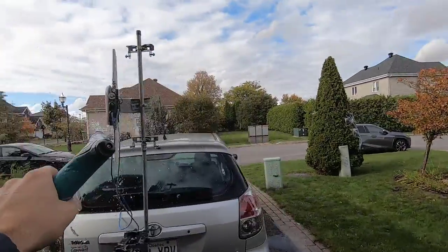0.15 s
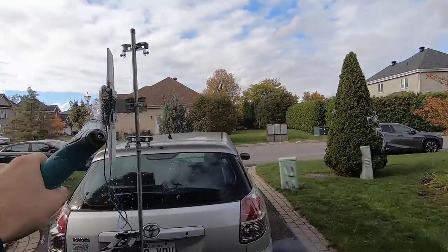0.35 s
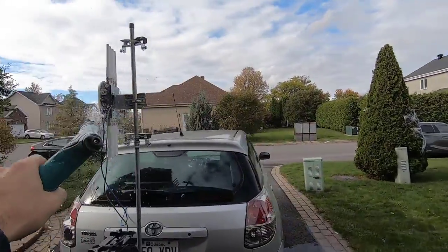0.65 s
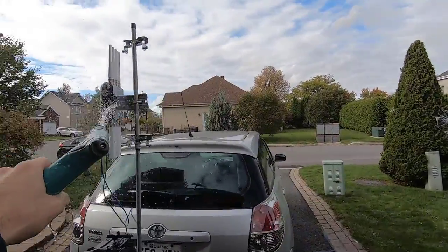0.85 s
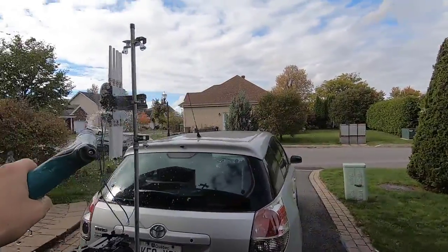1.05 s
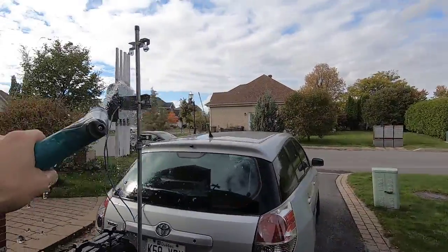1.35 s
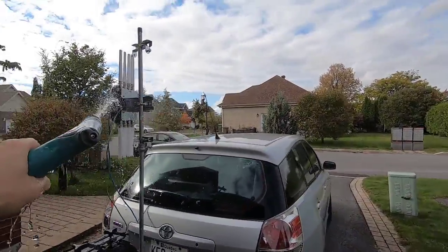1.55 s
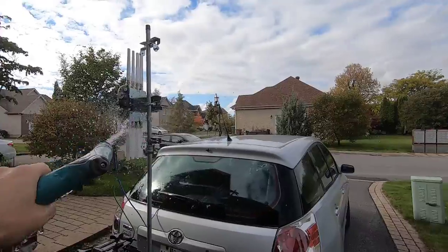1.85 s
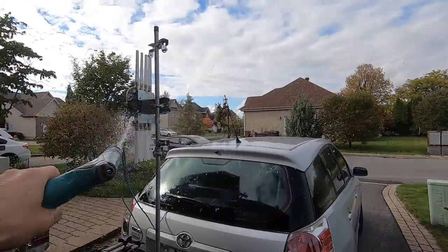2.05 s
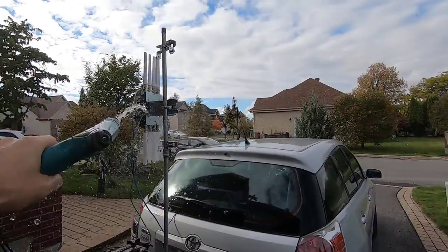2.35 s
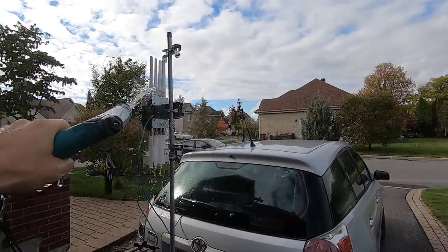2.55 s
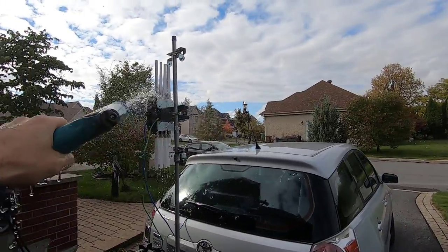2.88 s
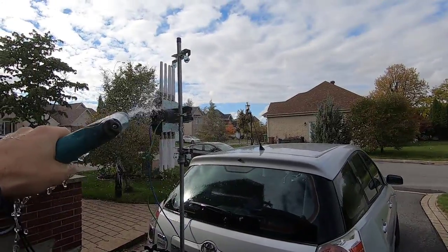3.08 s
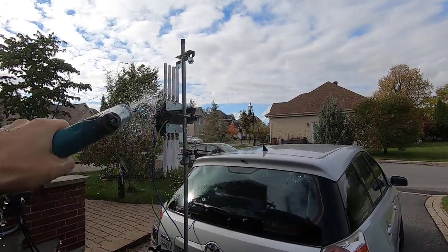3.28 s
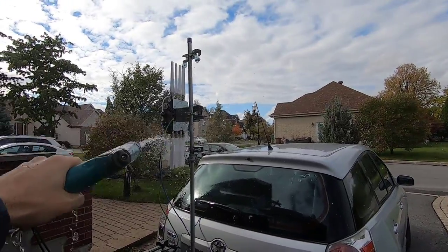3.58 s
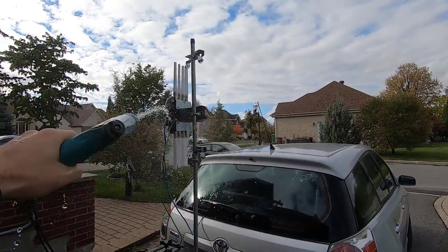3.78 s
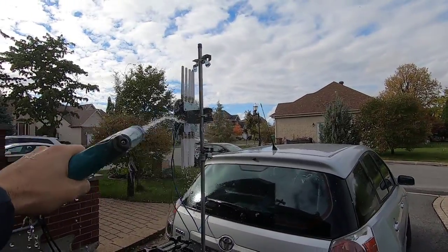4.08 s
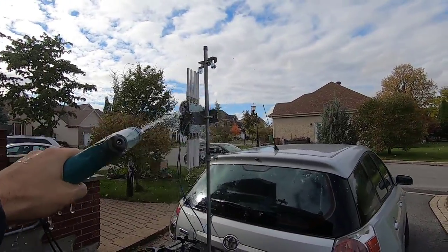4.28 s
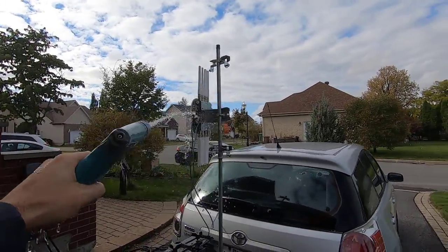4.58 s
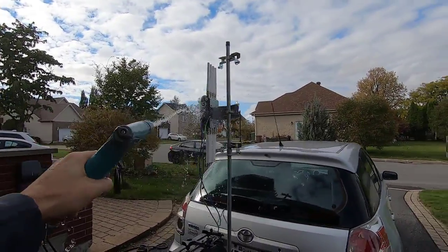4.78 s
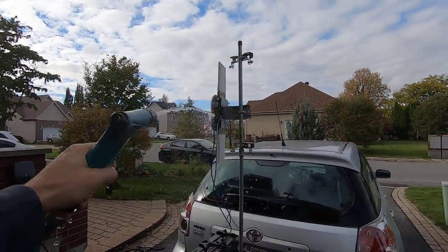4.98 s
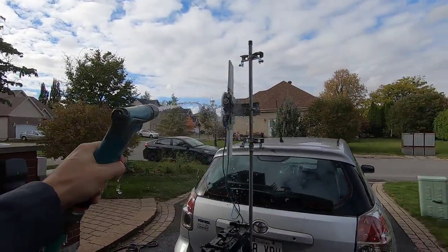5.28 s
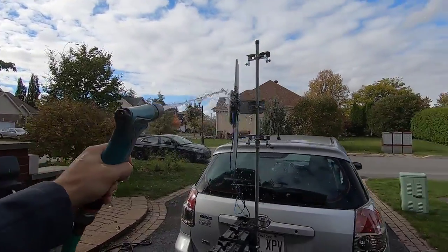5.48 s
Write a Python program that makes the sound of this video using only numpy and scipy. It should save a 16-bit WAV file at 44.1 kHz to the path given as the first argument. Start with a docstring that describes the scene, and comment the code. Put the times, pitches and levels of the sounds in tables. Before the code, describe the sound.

A garden hose jet spatters brightly on a thin antenna, cracking and rattling, while run-off thuds on a car roof outdoors.

```python
"""On a quiet street, a garden hose plays over an antenna on a mast behind a parked car.
The jet breaks into drops: random impacts that spatter on the antenna and rattle its hollow panel.
Run-off excites the damped modes of the car roof; fat drops ping, slugs slap and air pockets ring.
The nozzle hisses and the street murmurs as steady coloured noise.
A light breeze adds a low, uneven rumble at the two ports of a small camera, with a few soft bumps."""
import sys
import numpy as np
from scipy import signal
from scipy.fft import rfft, irfft, next_fast_len
from scipy.io import wavfile
from scipy.ndimage import uniform_filter1d

SR = 44100
rng = np.random.default_rng(int(sys.argv[2]) if len(sys.argv) > 2 else 0)


def waveform_to_disk(signal):
    """Save audio, clipped to [-1, 1], as 16-bit WAV at the path in sys.argv[1]."""
    frames = np.transpose(np.atleast_2d(signal))
    scaled = np.clip(frames, -1, 1) * 32767
    samples = np.round(scaled).astype(np.int16)
    wavfile.write(sys.argv[1], SR, samples)


N = 248283  # samples


def from_db(db):
    """Level to amplitude: every 20 dB is a factor of ten."""
    return 10 ** (np.asarray(db) / 20)


def rms_one(x):
    """Normalization: scale a signal to unit root-mean-square."""
    return x / np.sqrt(np.mean(x ** 2) + 1e-20)


def level(rows):
    """Level contour: (s, dB) points joined by straight lines in dB, as a gain per sample."""
    times, levels_db = np.transpose(rows)
    return from_db(np.interp(np.arange(N) / SR, times, levels_db))


def envelope(s, length_s, attack_s, decay_s):
    """Amplitude envelope: linear rise, hold until the length is over, exponential decay."""
    age = np.arange(N) / SR - s
    rise = np.clip(age / attack_s, 0, 1)
    return rise * np.exp(-np.clip((age - length_s) / decay_s, 0, 20))


def over_bins(points, size):
    """Spectral interpolation: a (Hz, value) table read at every bin on a log-frequency axis."""
    hz, value = np.transpose(points)
    bins_hz = np.arange(size // 2 + 1) * SR / size
    return np.interp(np.log(bins_hz + 1), np.log(hz), value)


def colour(x, spectrum):
    """Minimum-phase filtering: folding the cepstrum makes the given (Hz, dB) response causal."""
    size = 8192
    cepstrum = irfft(np.log(from_db(over_bins(spectrum, size))))
    cepstrum[1:size // 2] *= 2
    cepstrum[size // 2 + 1:] = 0
    impulse_response = irfft(np.exp(rfft(cepstrum)))
    return signal.oaconvolve(x, impulse_response[None], axes=1)[:, :N]


def shaped(x, spectrum):
    """Spectral shaping: colour with the spectrum, falling away beyond both its ends; rms 1."""
    (low, low_db), (high, high_db) = spectrum[0], spectrum[-1]
    return rms_one(colour(x, [(low / 2, low_db - 20), *spectrum, (high * 2, high_db - 40)]))


def band(x, low_hz, high_hz):
    """Band-pass filtering: a first-order design with gentle skirts."""
    edges = [max(low_hz, 10), min(high_hz, SR * .45)]
    return signal.sosfilt(signal.butter(1, edges, "band", fs=SR, output="sos"), x)


def drift(rate):
    """Slow random modulation: noise through a double pole near `rate` Hz, with unit rms."""
    step = 20  # samples between computed points
    settle = 2000  # points dropped while the filter settles
    r = np.exp(-2 * np.pi * step * rate / SR)
    noise = rng.standard_normal(N // step + settle + 2)
    slow = signal.lfilter([1], [1, -2 * r, r * r], noise)[settle:]
    return np.interp(np.arange(N) / step, np.arange(len(slow)), rms_one(slow))


def stereo_noise(alike, size):
    """Partial coherence: white noise at two ports that share the part `alike` of its power."""
    both, *own = rng.standard_normal((3, size))
    alike = np.clip(alike, 0, 1)
    return np.sqrt(alike) * both + np.sqrt(1 - alike) * np.array(own)


def steady(x, span_s):
    """Constant flow: even out the mean power over spans longer than span_s."""
    power = uniform_filter1d(np.mean(x ** 2, axis=0), int(span_s * SR) + 1)
    return x / np.sqrt(power + 1e-9)


def drops(per_s, spread_db, clump_db, clump_rate):
    """Random impacts: drops of uneven size and sign, stronger and weaker in clumps."""
    size_db = spread_db * np.minimum(rng.exponential(1, N), 3.8)
    sizes = from_db(size_db + clump_db * drift(clump_rate))
    return sizes * rng.choice([-1, 1], N) * (rng.random(N) < per_s / SR)


def splashes(impacts, pitches, width_hz, crack_s, tail_s, tail_db, alike, wander_db):
    """Impact response: each landing spot has its own band, short crack and diffuse droplet tail."""
    t = np.arange(2048) / SR
    spot, out = rng.integers(0, len(pitches), N), 0
    for k, hz in enumerate(pitches):
        crack = rms_one(stereo_noise(alike, len(t)) * np.exp(-t / crack_s))
        tail = rms_one(stereo_noise(0, len(t)) * np.exp(-t / tail_s))
        # the geometric mean of the band edges is the spot's pitch
        low = np.hypot(hz, width_hz / 2) - width_hz / 2
        splash = rms_one(band(crack + from_db(tail_db) * tail, low, low + width_hz))
        aim = from_db(wander_db * drift(27.4))  # the jet wanders from spot to spot
        landed = impacts * aim * (spot == k)
        out = out + signal.oaconvolve(landed[None], splash, axes=1)
    return out


def ring(clicks, hz, t60):
    """Damped resonance: a two-pole mode of about unit energy, falling 60 dB in t60 seconds."""
    r, w = from_db(-60 / (t60 * SR)), 2 * np.pi * hz / SR
    mode = signal.lfilter([0, np.sin(w)], [1, -2 * r * np.cos(w), r * r], clicks + 1e-18)
    return 2 * np.sqrt(1 - r) * mode


# Rumble of the breeze before its gusts. Each row: time in seconds, relative level in dB.
BREEZE_LEVEL = [(0, -44.5), (.2, -55), (.6, -51), (2.2, -55.5), (4.3, -56), (5.63, -51)]
# Spectrum of the breeze. Each row: frequency in Hz, relative level in dB per Hz.
BREEZE_COLOUR = [(12, 0.5), (28, 2.5), (45, -1), (75, -21), (130, -19), (400, -32)]
# Soft bumps on the camera. Each row: peak time in seconds, relative level in dB, decay in seconds.
CAMERA_BUMPS = [(0.017, -42.5, 0.048), (0.121, -38, 0.015), (1.239, -41, 0.047), (5.415, -34.5, 0.03)]


def breeze():
    """Flow noise: nearly incoherent, gust-modulated rumble at the ports, with decaying soft bumps."""
    t = np.arange(N) / SR
    force = sum(from_db(db) * (t > s) * np.exp(-np.abs(t - s) / decay_s)
                for s, db, decay_s in CAMERA_BUMPS)
    bump_colour = [(25, 16.0), (55, 14.5), (100, 2.5), (190, -2), (300, -13)]  # (Hz, dB per Hz)
    bumps = force * steady(shaped(stereo_noise(0.063, N), bump_colour), span_s=0.0069)
    gusts = from_db(3.5 * drift(8) - 1.5)
    rumble = shaped(stereo_noise(0.11, N), BREEZE_COLOUR)
    return bumps + from_db(-0.5) * level(BREEZE_LEVEL) * gusts * rumble


# Spectrum of the hiss. Each row: frequency in Hz, relative level in dB per Hz.
HISS_COLOUR = [(2000, 7.5), (4300, 8.5), (5200, 19), (5900, 14), (7000, 6.5), (8700, 1), (10000, 14),
               (11500, 4), (14500, -4)]


def nozzle():
    """Jet noise: a steady, weakly coherent hiss with a coloured spectrum."""
    return from_db(-47.5) * shaped(stereo_noise(0.13, N), HISS_COLOUR)


# Spectrum of the street. Each row: frequency in Hz, relative level in dB per Hz.
MURMUR_COLOUR = [(30, -20), (100, -14.5), (190, -2), (500, -7), (1000, -3.5), (1700, -2.5), (2600, -15)]


def street():
    """Ambient noise: a steady, partly coherent murmur, mostly at low and middle frequencies."""
    return from_db(-56.0) * shaped(stereo_noise(0.58, N), MURMUR_COLOUR)


# Strength of the spatter while the jet is on. Each row: time in seconds, relative level in dB.
JET_LEVEL = [(0, -39.5), (0.55, -33), (0.75, -34.5), (1.0, -33), (1.55, -34.5), (1.82, -31), (2.03, -34.5),
             (2.18, -33), (2.35, -35), (2.9, -37.5), (3.22, -33), (3.9, -30.5), (4.3, -35), (4.8, -32),
             (5.63, -35.5)]
# The jet is on the antenna. Each row: start in seconds, length in seconds, relative level in dB.
JET_SWEEPS = [(0.076, 0.12, 1.5), (0.23, 0.2, -16.5), (0.453, 2.66, -0.5), (3.124, 0.46, -1.5),
              (3.61, 0.12, -2), (3.803, 0.26, -4), (4.096, 0.1, 1), (4.205, 0.13, 1.5),
              (4.324, 0.075, -8.5), (4.623, 0.26, -1), (4.961, 0.07, -6), (5.054, 0.44, -1),
              (5.558, 0.11, 1)]
SWEEP_ATTACK_S, SWEEP_DECAY_S = 0.021, 0.0095
STRAY_DB = -12  # drops that still land when the jet slips past


def jet():
    """Driving force: water on the antenna comes and goes as the hand sweeps the jet on and off."""
    on = [from_db(db) * envelope(s, length_s, SWEEP_ATTACK_S, SWEEP_DECAY_S)
          for s, length_s, db in JET_SWEEPS]
    return level(JET_LEVEL) * np.hypot(np.max(on, axis=0), from_db(STRAY_DB))


# Colouring of the fine spatter. Each row: frequency in Hz, filter gain in dB.
FINE_COLOUR = [(400, -7), (1000, -11), (2100, -3), (2650, -10), (3200, 0), (3700, 0.5), (4300, -2.5),
               (5600, 4.5), (6900, -2), (8000, 4), (9000, -0.5), (10000, 5), (12800, -9.5), (14500, -14.5)]


def spatter(force):
    """Random impact noise: drops crack on antenna and mast, thinning out as the jet slips past."""
    rate = 3000 * (force / force.max()) ** 1.1  # drops per second
    impacts = drops(per_s=rate, spread_db=4.2, clump_db=1.5, clump_rate=180)
    wet = splashes(impacts, np.linspace(2800, 13500, num=22), width_hz=1900, crack_s=0.00045,
                   tail_s=0.01, tail_db=-5.5, alike=0.88, wander_db=3.2)
    sway = from_db(0.98 + 1.22 * drift(9.2))
    return sway * force * steady(shaped(wet, FINE_COLOUR), span_s=0.04)


# The jet meets the panel squarely. Each row: start in seconds, length in seconds (also the rise
# time), relative level in dB.
SQUARE_HITS = [(0.142, 0.016, -41.5), (0.946, 0.041, -42.5), (1.094, 0.032, -40), (1.594, 0.043, -37.5),
               (1.787, 0.13, -47), (2.405, 0.095, -37), (2.968, 0.017, -45), (3.148, 0.054, -41.5),
               (3.48, 0.071, -41.5), (3.939, 0.064, -47), (4.088, 0.069, -40.5)]
# Colouring of the panel. Each row: frequency in Hz, filter gain in dB.
HOLLOW_COLOUR = [(300, -29.5), (650, 2), (920, -3.5), (1150, 1), (1550, 5), (2200, 1.5), (3400, 4),
                 (4500, 0), (7000, -26)]
RATTLE_DECAY_S = 0.033
GLANCING_DB = -19  # the panel's share of any spatter
PLOP_CYCLES, PLOP_DB = 64, -12  # trapped air: cycles to fall 60 dB, level against the cracks


def panel(force):
    """Cavity resonance: drops rattle the hollow plastic panel and ring pockets of air against it."""
    square = sum(from_db(db) * envelope(s, length_s, length_s, RATTLE_DECAY_S)
                 for s, length_s, db in SQUARE_HITS)
    impacts = drops(per_s=600, spread_db=3.0, clump_db=1.5, clump_rate=50)
    hollow = splashes(impacts, np.linspace(700, 4000, num=10), width_hz=1500, crack_s=0.0008,
                      tail_s=0.014, tail_db=-3, alike=0.74, wander_db=3.5)
    pitches = np.geomspace(780, 2400, num=24)
    pocket = rng.integers(0, 2 * len(pitches), N)  # about half of the drops trap air
    plops = sum(ring(impacts * (pocket == k), hz, PLOP_CYCLES / hz) for k, hz in enumerate(pitches))
    rattle = shaped(rms_one(hollow[:, :N]) + from_db(PLOP_DB) * rms_one(plops), HOLLOW_COLOUR)
    force_on_panel = np.hypot(square, from_db(GLANCING_DB) * force)
    return from_db(6.0) * force_on_panel * steady(rattle, span_s=0.064)


# Steady dripping between gushes. Each row: time in seconds, relative level in dB.
DRIPPING_LEVEL = [(0, -64), (0.55, -55), (0.92, -58.5), (1.6, -51), (2.2, -54.5), (2.8, -52.5), (3.3, -59),
                  (3.8, -50.5), (4.5, -56.5), (4.8, -52), (5.05, -58.5), (5.63, -64)]
# Gushes of run-off. Each row: start in seconds, length in seconds, relative level in dB.
ROOF_GUSHES = [(0.096, 0.038, -45), (0.36, 0.11, -50.5), (1.084, 0.08, -47.5), (1.209, 0.028, -45),
               (1.409, 0.023, -45.5), (1.704, 0.13, -46.5), (1.874, 0.018, -43.5), (2.398, 0.031, -43.5),
               (2.958, 0.079, -48), (4.065, 0.048, -42.5), (5.46, 0.043, -50.5)]
# Modes of the roof panel. Each row: frequency in Hz, relative level in dB, 60 dB decay in seconds.
SHEET_MODES = [(156, -4, 0.73), (185, 1, 0.26), (213, -0.5, 0.13), (254.6, -2, 0.34), (288, -5, 0.09),
               (341.4, -0.5, 0.91), (420, -1, 0.23), (470, -5.5, 0.1), (545, -6, 0.19), (761, -3, 0.096)]
# Colouring of the thuds. Each row: frequency in Hz, filter gain in dB.
ROOF_COLOUR = [(90, -18.5), (135, -29), (170, 3.5), (400, -2), (600, -13), (900, -3.5), (2000, -17.5)]
GUSH_ATTACK_S, GUSH_DECAY_S = 0.012, 0.029
RUN_OFF_EVEN_S = 0.055  # power is evened out over longer spans


def roof():
    """Modal excitation: run-off thuds on the sheet metal and sets its low modes humming."""
    gushes = sum(from_db(db) * envelope(s, length_s, GUSH_ATTACK_S, GUSH_DECAY_S)
                 for s, length_s, db in ROOF_GUSHES)
    impacts = drops(per_s=190, spread_db=3.0, clump_db=2.5, clump_rate=12)
    thuds = splashes(impacts, np.linspace(200, 800, num=6), width_hz=370, crack_s=0.0058,
                     tail_s=0.0028, tail_db=-3.5, alike=1.0, wander_db=-1.0)
    hum = sum(from_db(db) * ring(impacts * rng.standard_normal(N), hz, t60)
              for hz, db, t60 in SHEET_MODES)
    drumming = shaped(thuds, ROOF_COLOUR) + from_db(-1.0) * rms_one(hum)
    flow = np.hypot(gushes, level(DRIPPING_LEVEL))
    return from_db(0.47) * flow * steady(drumming, span_s=RUN_OFF_EVEN_S)


# Single fat drops. Each row: start in seconds, relative peak level in dB, pitch in Hz.
SINGLE_DROPS = [(0.0987, -23, 5400), (0.1205, -20.5, 5630), (0.162, -20.5, 5370), (0.184, -19, 7300),
                (0.2454, -28, 5200), (0.332, -26.5, 5730), (0.378, -21.5, 5340), (0.4594, -25.5, 3450),
                (0.4835, -21, 3260), (0.4874, -20, 5310), (0.549, -27.5, 3720), (0.5828, -26, 3260),
                (0.8136, -22, 5300), (0.905, -19.5, 5500), (0.9748, -19.5, 3680), (1.0186, -16, 8050),
                (1.048, -13, 10100), (1.1055, -18.5, 4500), (1.1107, -22, 3220), (1.1297, -21, 3470),
                (1.26, -17.5, 4900), (1.3088, -17, 5640), (1.3606, -21, 7600), (1.3886, -18, 4800),
                (1.591, -22, 5450), (1.6065, -25, 3110), (1.6144, -25, 2930), (1.6172, -27, 3620),
                (1.6831, -19, 9800), (1.8114, -17, 7700), (1.8505, -20.5, 3140), (1.9335, -22.5, 2990),
                (2.1162, -13, 10500), (2.138, -23.5, 3320), (2.1667, -15, 5160), (2.1932, -16.5, 5600),
                (2.4077, -16.5, 9800), (2.4533, -24.5, 3260), (2.5424, -18, 4900), (2.668, -17.5, 7800),
                (2.76, -13.5, 5950), (2.824, -16, 9760), (2.8883, -30, 3440), (3.04, -21.5, 5830),
                (3.2735, -13.5, 6200), (3.3774, -18.5, 8100), (3.5632, -20.5, 3800), (3.6882, -17.5, 5900),
                (3.705, -14, 5800), (3.718, -15.5, 6230), (3.9056, -25.5, 3700), (3.9838, -28, 5500),
                (4.0078, -17, 10600), (4.0892, -22, 9870), (4.116, -28, 5830), (4.156, -19.5, 6000),
                (4.2558, -20.5, 3730), (4.2654, -20, 10400), (4.296, -23, 3470), (4.3094, -26, 8100),
                (4.4214, -34.5, 5200), (4.4866, -21, 6200), (4.6309, -20.5, 5800), (4.8045, -19, 5500),
                (4.8413, -21, 4300), (4.9745, -17.5, 5940), (5.018, -28.5, 3600), (5.077, -26, 10700),
                (5.0987, -22, 4170), (5.122, -20.5, 3750), (5.2175, -13.5, 9700), (5.3033, -14.5, 7800),
                (5.3622, -14, 10300), (5.4017, -21, 5600), (5.5544, -22.5, 5440)]
DROP_DB, DROP_SPRAY_DB = 3.5, -8  # level of all drops; spray within a drop
DROP_BURST_S, DROP_CYCLES, DROP_CRACK_S = .0006, 2.2, .0005  # delay, cycles to ping's peak, crack decay
STRAY_PAN_DB = -7.5  # left-right: drops that miss the antenna land further right


def fat_drops(force):
    """Transient radiation: a sharp crack, a ping of a few cycles and a faint spray in its range."""
    out, t = np.zeros((2, N)), np.arange(2048) / SR
    for s, db, hz in SINGLE_DROPS:
        age = t * hz / DROP_CYCLES
        ping = age * np.exp(1 - age) * np.sin(2 * np.pi * hz * t)
        crack = band(stereo_noise(0.9, len(t)) * np.exp(-t / DROP_CRACK_S), hz * 0.8, hz * 1.7)
        crack = from_db(7) * band(crack, 2000, 9000)
        spray = band(stereo_noise(0.6, len(t)) * np.exp(-t / 0.005), hz * 0.8, hz * 1.15)
        drop = ping + crack + from_db(DROP_SPRAY_DB) * spray / spray.max()
        drop = from_db(db + DROP_DB) * drop / np.abs(drop).max()
        at = round((s + DROP_BURST_S) * SR)
        # a weak jet at this moment counts as a miss
        pan_db = STRAY_PAN_DB * np.clip(1 - force[at] / np.median(force), 0, 1)
        panned = drop * from_db([[pan_db / 2], [-pan_db / 2]])
        out[:, at:at + len(t)] += panned[:, :N - at]
    return out


# Slugs landing all at once. Each row: start in seconds, relative level in dB, reference pitch in Hz.
SLUGS = [(0.405, -37, 900), (1.428, -40.5, 850), (2.960, -37, 470), (3.502, -27.5, 442),
         (3.6606, -27.5, 419)]
SLAP_CRACK_DB, SLAP_SMACK_DB, SLAP_SLOSH_DB = 14, 8, 7.5
SLAP_SAG, SLAP_SAG_S = 0.25, 0.0216  # the ring falls in pitch as the slug spreads: share, time
# hollow ring: level, share of the reference pitch, decay in seconds, depth of waver
SLAP_RING_DB, SLAP_RING_SHARE, SLAP_RING_S, SLAP_RING_WAVER = -5.5, .9, .036, .15
SLAP_BOOM_DB, SLAP_BOOM_SHARE = -4, .56  # lower mode: level and pitch against the ring


def slaps():
    """Water impact: a crack and broad smack, a ragged slosh and a hollow ring that sags and wavers."""
    out, t = np.zeros((2, N)), np.arange(8192) / SR
    waver, ragged = drift(50), from_db(4 * drift(150))
    for s, db, reference_hz in SLUGS:
        at = round(s * SR)
        span = slice(at, at + len(t))
        crack = from_db(SLAP_CRACK_DB) * np.exp(-t / 0.0001)
        smack = from_db(SLAP_SMACK_DB) * stereo_noise(0.7, len(t)) * np.exp(-t / 0.008)
        slosh = from_db(SLAP_SLOSH_DB) * stereo_noise(0.9, len(t)) * ragged[span] * np.exp(-t / 0.02)
        # time is warped so that the pitch sags and wavers
        sagging = t - SLAP_SAG * (t - SLAP_SAG_S * (1 - np.exp(-t / SLAP_SAG_S)))
        wavering = sagging + SLAP_RING_WAVER * np.cumsum(waver[span]) / SR
        turn = 2 * np.pi * SLAP_RING_SHARE * reference_hz * wavering
        modes = np.sin(turn) + from_db(SLAP_BOOM_DB) * np.sin(SLAP_BOOM_SHARE * turn)
        hollow = from_db(SLAP_RING_DB) * modes * np.exp(-t / SLAP_RING_S)
        hit = band(crack + smack, low_hz=400, high_hz=2100)
        out[:, span] += from_db(db) * (hit + band(slosh, low_hz=220, high_hz=760) + hollow)
    return band(out, low_hz=150, high_hz=3200)


# Bursts of coarse drops. Each row: start in seconds, length in seconds, relative level in dB.
BIG_DROP_BURSTS = [(0.55, 0.053, -36), (1.79, 0.15, -39), (2.435, 0.22, -40.5), (3.144, 0.092, -40),
                   (3.513, 0.079, -42), (4.131, 0.048, -37.5), (4.22, 0.12, -43.5), (5.069, 0.061, -34),
                   (5.373, 0.086, -38)]
# Colouring of the coarse drops. Each row: frequency in Hz, filter gain in dB.
BIG_DROP_COLOUR = [(1800, -3), (2600, -7.5), (3300, 1), (4100, -6), (5500, 1), (9000, -9)]
COARSE_ATTACK_S, COARSE_DECAY_S = 0.011, 0.031


def coarse_spatter():
    """Jet break-up: bursts of fewer, bigger drops, which plop lower than the fine spray."""
    force = sum(from_db(db) * envelope(s, length_s, COARSE_ATTACK_S, COARSE_DECAY_S)
                for s, length_s, db in BIG_DROP_BURSTS)
    impacts = drops(per_s=280, spread_db=3.5, clump_db=3.0, clump_rate=65)
    plops = splashes(impacts, np.linspace(2600, 4800, num=7), width_hz=920, crack_s=0.0011,
                     tail_s=0.012, tail_db=-5, alike=0.88, wander_db=3.5)
    return force * steady(shaped(plops, BIG_DROP_COLOUR), span_s=0.036)


# Big air pockets closing in the water, the largest in the run-off.
# Each row: start in seconds, relative level in dB, starting pitch in Hz.
AIR_POCKETS = [(0.663, -40, 185), (0.935, -33.5, 1500), (0.946, -31.5, 1250), (1.128, -29, 1700),
               (1.226, -35, 185), (1.428, -35.5, 175), (1.438, -35, 320), (1.608, -27, 920),
               (1.618, -31, 1700), (1.636, -32, 1400), (1.760, -32, 175), (1.888, -35.5, 175),
               (1.893, -37.5, 375), (2.469, -34, 1530), (2.491, -33, 900), (2.493, -29, 1480),
               (2.986, -35, 255), (3.014, -34, 268), (3.101, -40, 215), (5.217, -41, 188)]
GLUG_CYCLES, GLUG_RISE = 5.5, .06  # decay in cycles; share of its pitch by which it rises


def glugs():
    """Bubble resonance: an air pocket closes with a wet smack and rings, rising, with an upper mode."""
    out, t = np.zeros((2, N)), np.arange(8192) / SR
    for s, db, hz in AIR_POCKETS:
        cycles = t * hz
        turn = 2 * np.pi * cycles * (1 + GLUG_RISE * (1 - np.exp(-cycles / 10)))
        modes = np.sin(turn) + from_db(-9.5) * np.sin(1.75 * turn)
        body = modes * np.exp(-cycles / GLUG_CYCLES) * (1 - np.exp(-cycles))
        smack = band(stereo_noise(1.0, len(t)) * np.exp(-t / 0.011), hz * 0.96, hz * 1.4)
        at = round(s * SR)
        out[:, at:at + len(t)] += from_db(db) * (body + from_db(4) * smack)
    return out


# Phase between the ports. Each row: frequency in Hz, lead of the left port in radians.
LEFT_LEAD = [(700, -.2), (1200, .9), (2050, 2.9), (2700, -.3), (3400, .55), (5500, 1.2), (6600, 2.0),
             (7200, 0), (8000, 1.1), (9300, 2.8), (11000, .9)]


def from_the_left(x):
    """Phase difference: the right port is delayed in phase by the left port's lead at each frequency."""
    size = next_fast_len(N + 4096)
    right = irfft(rfft(x[1], size) * np.exp(-1j * over_bins(LEFT_LEAD, size)), size)[:N]
    return np.array([x[0], right])


# Unequal colour of the ports. Each row: frequency in Hz, left-right level difference in dB.
LEFT_RIGHT_BALANCE = [(300, 0), (700, -4.5), (1200, 0), (1750, 2.5), (2700, -1.5), (3400, 0), (4400, 2),
                      (5700, -4), (7000, -4), (8200, 5), (9200, -7), (10000, 21.5), (11600, -4),
                      (13500, 7.5)]


def ports(x):
    """Cavity resonance: each port has its own, which tip the power to one side."""
    hz, tip_db = np.transpose(LEFT_RIGHT_BALANCE)
    # the two power gains always add up to 2
    gains_db = [10 * np.log10(2 / (1 + from_db(side * tip_db) ** 2)) for side in (-1, 1)]
    return np.vstack([colour(x[[k]], np.column_stack([hz, gains_db[k]])) for k in range(2)])


def scene():
    """Superposition: water on antenna and roof, over the nozzle's hiss, the street and the breeze."""
    force = jet()
    water = spatter(force) + fat_drops(force) + coarse_spatter() + panel(force) + roof()
    from_jet_side = from_the_left(water + nozzle() + street())
    return ports(from_jet_side + slaps() + glugs()) + breeze()


def record(dry):
    """Band limiting: a steep low-pass holds everything above 15.7 kHz at least 60 dB down."""
    return signal.sosfilt(signal.cheby2(14, 60, 15700, fs=SR, output="sos"), dry)


dry = scene()
out = record(dry)
waveform_to_disk(out)
```